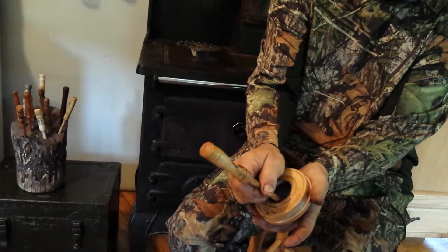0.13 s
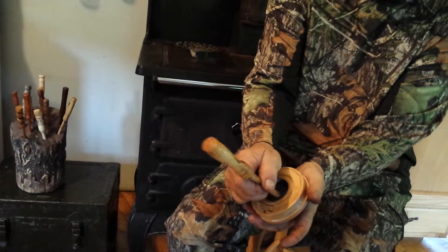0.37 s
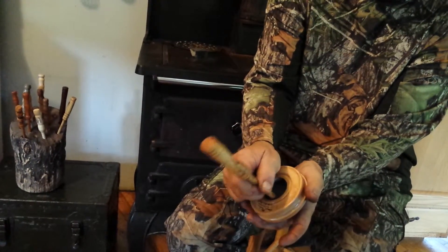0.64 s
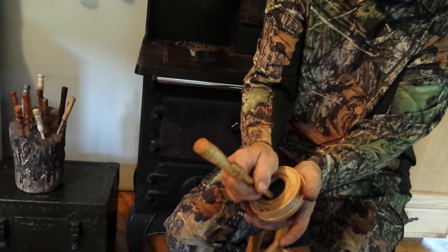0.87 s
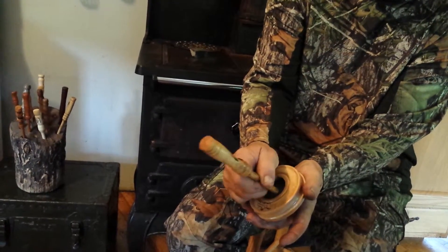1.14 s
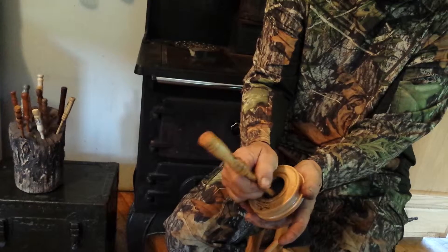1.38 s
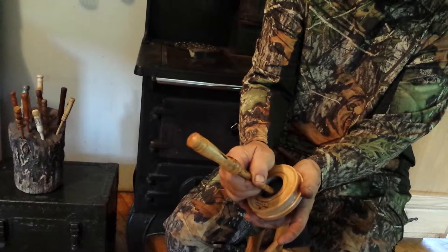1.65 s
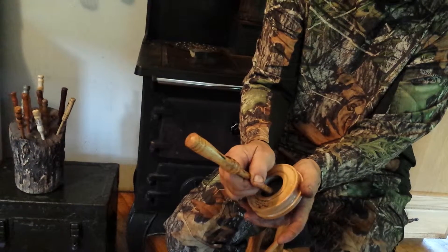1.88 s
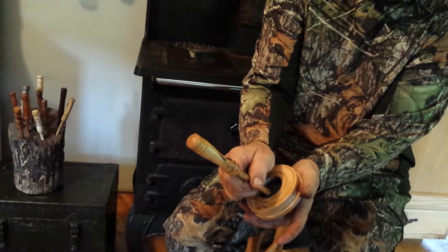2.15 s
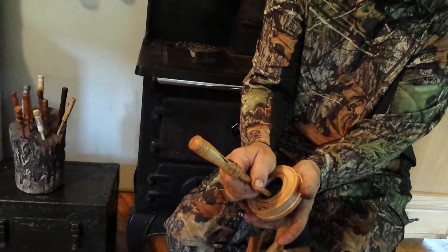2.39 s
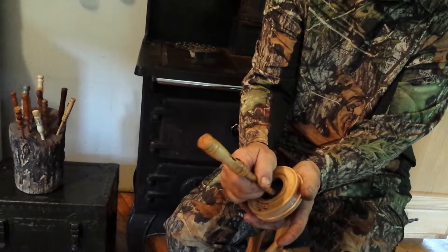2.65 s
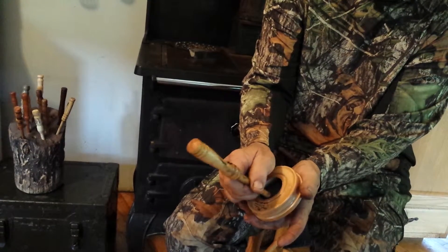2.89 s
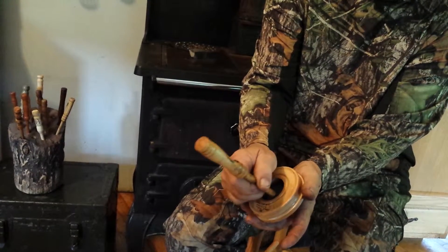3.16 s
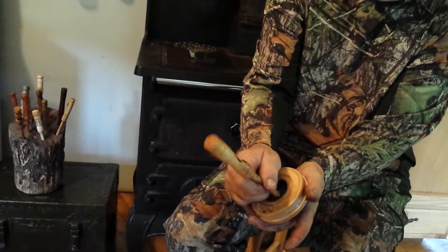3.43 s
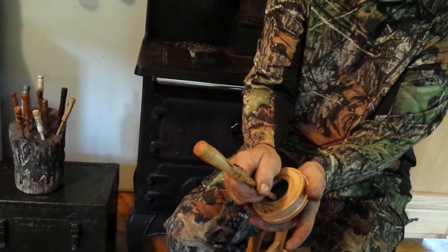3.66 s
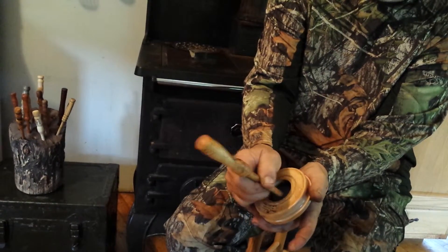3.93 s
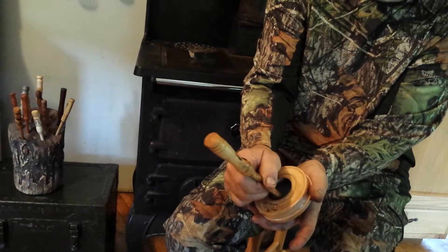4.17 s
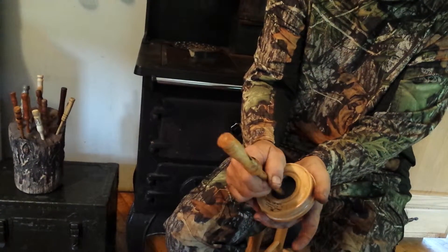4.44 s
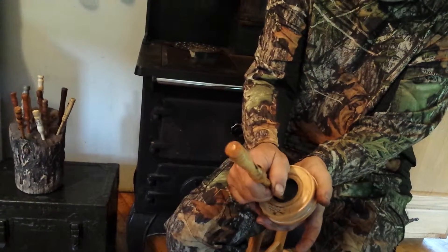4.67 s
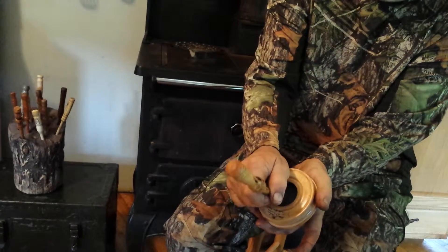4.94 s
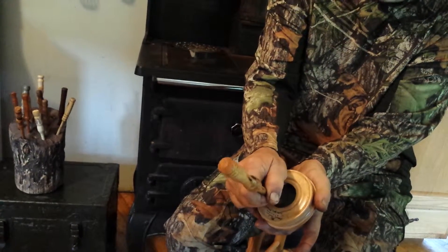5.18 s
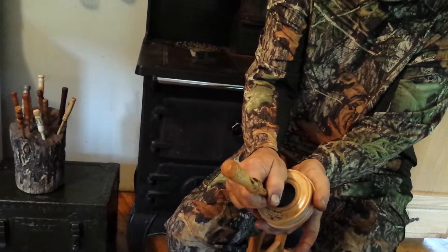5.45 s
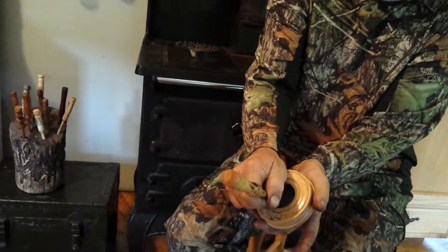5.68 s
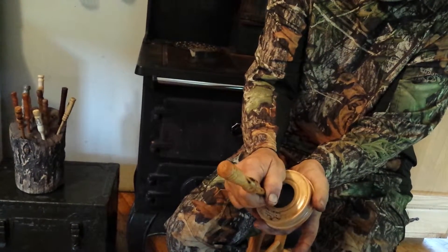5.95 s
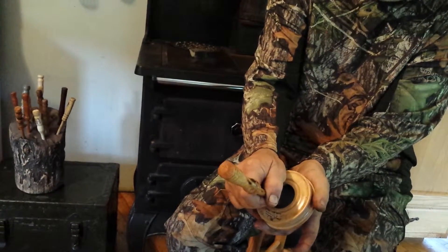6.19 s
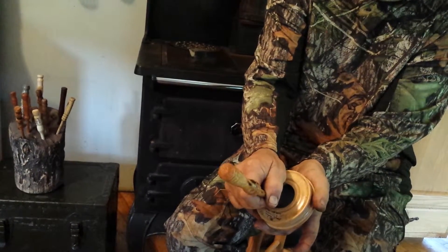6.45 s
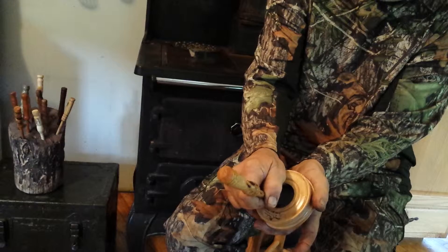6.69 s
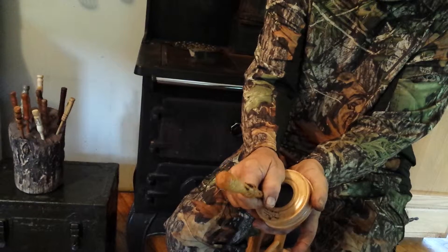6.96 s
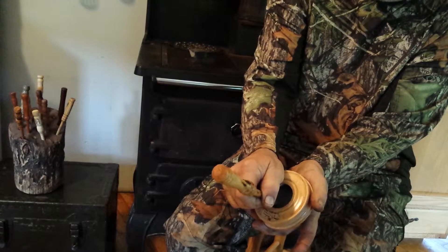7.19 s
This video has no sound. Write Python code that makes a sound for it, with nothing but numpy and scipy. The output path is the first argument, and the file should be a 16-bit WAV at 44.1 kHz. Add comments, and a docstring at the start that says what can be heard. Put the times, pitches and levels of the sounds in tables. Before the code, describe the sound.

A wooden striker on a slate turkey call gives a brief yelp, spaced sharp two-note clucks, then stuttering raspy purrs in a lively room.

```python
"""A bare, lively room, where a wooden striker is dragged over the slate of a pot call.
The tip sticks and slips hundreds of times a second, and that force rings the resonances of slate and pot.
A short yelp of sliding contacts opens; sharp clucks follow, a squeak breaking to a lower note; then purrs
in which the tip slides and hops along. Hisses of the free tip, taps and dry shaft ticks are strewn about.
Appliances hum faintly under air and hiss. The recorder ducks loud notes, rounds peaks, turns the quiet down."""
import sys
import numpy as np
from scipy import signal
from scipy.fft import rfft, irfft
from scipy.io import wavfile
from scipy.ndimage import uniform_filter1d

SR = 44100
rng = np.random.default_rng(int(sys.argv[2]) if len(sys.argv) > 2 else 0)


def log_audio(samples):
    """Write samples as a 16-bit WAV file to the path given in sys.argv[1]."""
    # one column per channel
    frames = np.atleast_2d(samples).T
    # limit to full scale, then quantise
    limited = np.clip(frames, -1, 1)
    pcm = np.round(limited * 32767).astype(np.int16)
    wavfile.write(sys.argv[1], SR, pcm)


def to_linear_factor(level_db):
    """Convert decibel levels (scalar or array-like) to linear amplitude factors."""
    exponent = np.asarray(level_db, float) / 20
    return 10 ** exponent


N = 323253

# Clucks. Each row: time of the pitch break in seconds, relative level in dB, mid-note pitch in Hz,
# squeak length in seconds, note length in seconds.
CLUCK_STROKES = [(0.758, -11.5, 573.5, .020, .05), (1.133, -7.5, 555.3, 0.017, .024),
                 (1.489, -10.5, 587.1, 0.022, .034), (2.719, -11.5, 579.7, 0.027, .037),
                 (3.122, -7, 587.8, 0.024, .03), (3.499, -6.5, 587.4, 0.019, .022),
                 (3.879, -8.5, 583.6, .018, .034)]
# The tip stays down and slides. Each row: start in seconds, relative level in dB, length in seconds,
# settling pitch in Hz, final pitch in Hz.
SLIDING_CONTACTS = [(0.284, -38.5, 0.022, 731, 710), (0.295, -18.5, .037, 587.8, 638),
                    (0.333, -27, 0.029, 733, 630), (0.347, -19.5, .082, 606, 568.5),
                    (4.925, -38.5, .049, 500, 517), (4.966, -30, .035, 540, 727),
                    (5.03, -28, 0.034, 689, 692), (5.074, -16.5, .09, 618, 744),
                    (5.496, -32.5, .034, 512, 606), (5.536, -31, 0.033, 557, 600),
                    (5.588, -27.5, .038, 576, 620), (5.624, -23.5, 0.026, 605, 663),
                    (5.69, -15.5, .034, 620, 828), (6.727, -36.5, 0.067, 554, 670)]
# The tip bounces along in a purr. Each row: start in seconds, relative level in dB, length in seconds.
HOPPING_CONTACTS = [(5.018, -22.5, .018), (5.045, -23.5, .031), (5.658, -18, .03), (5.732, -16, .034),
                    (5.771, -17.5, .026), (6.79, -30.5, 0.025), (6.825, -27, 0.016), (6.856, -26.5, .019),
                    (6.884, -29.5, 0.018), (6.915, -24.5, .02), (6.947, -22.5, 0.017), (6.976, -19, .022),
                    (7.008, -17.5, .021), (7.049, -21, .019)]
# The tip brushes the slate without gripping. Each row: start in seconds, relative level in dB,
# length in seconds.
LOOSE_BRUSHES = [(.07, -44, 0.057), (0.138, -44, 0.055), (.185, -36.5, .09), (.282, -32.5, .025)]
# The tip is set down on the slate. Each row: time in seconds, relative level in dB.
TIP_TAPS = [(0.023, -35.5), (0.615, -12), (0.978, -11.5), (2.489, -33), (3.706, -24), (4.917, -34.5),
            (6.668, -44)]
# Small dry ticks of the shaft. Each row: time in seconds, relative level in dB, upper ring in Hz.
SHAFT_TICKS = [(3.0037, -37.5, 10630), (4.648, -46, 2770), (4.687, -42, 2750), (4.797, -39, 2750),
               (4.902, -39, 2790), (6.399, -44, 2700), (6.445, -44, 6330), (6.599, -41.5, 2660),
               (6.662, -43, 2760)]
# Resonances of slate and pot. Each row: centre in Hz, width in Hz, relative level in dB,
# left over right in dB.
BODY_MODES = [(620, 600, -25.5, -4), (862.3, 85, 0.5, 3.5), (1227, 520, -5.5, 10), (1713, 204, 5.5, 9.5),
              (2834, 506, -12, 6.5), (3977, 15, -17.5, -7.5), (4480, 475, -14, -5), (5827, 500, -13.5, 6),
              (7360, 1900, -23, 0.5), (10000, 5300, -34.5, -20.5), (12400, 2100, -32.5, -11)]
# Dead zones between the modes. Each row: centre in Hz, width in Hz, depth from 0 to 1.
DEAD_ZONES = [(1040, 57, 0.5), (2218, 1480, 0.88), (3740, 450, 0), (5000, 440, 0.7)]
# Echoes off the first walls. Each row: delay in seconds, left level in dB, right level in dB.
WALL_ECHOES = [(.025, -20, -12.5), (.031, -19.5, -22), (0.035, -26.5, -21), (.046, -17, -16.5),
               (.062, -32, -34), (0.067, -22, -22.5)]
# Decay of the room tail. Each row: octave centre in Hz, time to fall 60 dB in seconds,
# left over right in dB.
ROOM_DECAY = [(500, 0.51, 2.5), (990, 0.56, 1.5), (1820, 0.54, 3.5), (4330, 0.52, 0), (7400, 0.34, 2),
              (12010, 0.32, -6)]
# Hum lines of the appliances. Each row: frequency in Hz, relative level in dB.
HUM_LINES = [(120, -71.5), (147.5, -74.5), (200.5, -73), (238, -75.5), (360, -73.5), (599, -76.5)]
# Spectrum of air and hiss. Each row: frequency in Hz, relative level in dB.
AIR_SPECTRUM = [(12, -48.5), (20, -12), (153, 0.5), (175, -9), (245, -3), (534, -10), (597, -15),
                (667, -10), (2470, -16.5), (13500, -19.5), (15500, -31)]
# Likeness of the air in the two channels. Each row: frequency in Hz, likeness from 0 to 1.
AIR_WIDTH = [(30, 0), (150, .6), (600, 0), (3000, 0.069), (12000, 0.082)]


def clucks():
    """The tip squeaks high while it grips, tears loose with a rasp, drops and holds a lower note until lifted."""
    squeak_hz, squeak_sag_hz_per_s, note_sag_hz_per_s = 887.7, 2700, 220
    break_s, overshoot, settle_s = 0.0034, 0.09, 0.007
    note_fade_db, let_go_s = -3.5, 0.0058
    force = np.zeros(N)
    for s, db, note_hz, squeak_s, note_s in CLUCK_STROKES:
        t = np.arange(-squeak_s - .015, note_s + 0.048, 1 / SR)   # 0 at the pitch break
        after = np.maximum(t, 0)
        loose = .5 + .5 * np.tanh(t / break_s)
        squeak = squeak_hz - squeak_sag_hz_per_s * np.maximum(t + squeak_s, 0)
        note = note_hz * (1 + overshoot * np.exp(-after / settle_s))
        note = note - note_sag_hz_per_s * (t - note_s / 2)
        pitch = squeak + loose * (note - squeak)
        weaker_squeak = to_linear_factor(-9.5 * (1 - loose))
        onset = 1 / (1 + np.exp(-(t + 0.76 * squeak_s) / 0.0016))
        squeak_swell = to_linear_factor(4.0 * np.minimum(t / squeak_s, 0))
        held = to_linear_factor(note_fade_db * after / note_s) * np.exp(-np.maximum(t - note_s, 0) / let_go_s)
        rasp = 1.3 + 1.5 * np.exp(-(t / .006) ** 2)
        dull_hz = 11000 - 4000 * loose * (1 - np.exp(-after / 0.036))   # the note dulls as it goes on
        level = to_linear_factor(db) * weaker_squeak * onset * squeak_swell * held
        add(force, s + t[0], level * slips(pitch, 0.47, dull_hz, rasp))
    return force


def skips():
    """Each light contact settles from its landing pitch, then bends to its final one as the tip loads up.
    A deep drop in pitch on landing comes with a brief extra press of the tip."""
    landing_s, bend, edge_s = 0.0021, 3.0, 0.0017
    jolt, jolt_s = 1.6, 0.0079
    force = np.zeros(N)
    for s, db, length_s, landing_hz, settled_hz, final_hz, swell_db in contacts():
        t = np.arange(0, length_s, 1 / SR)
        pitch = settled_hz + (landing_hz - settled_hz) * np.exp(-t / landing_s)
        pitch = pitch + (final_hz - settled_hz) * (t / length_s) ** bend
        edges = np.minimum(t / (edge_s + 0.26 * length_s), (length_s - t) / edge_s)
        contact = np.sin(np.pi / 2 * np.clip(edges, 0, 1))
        dull_hz = 4600 * to_linear_factor(0.18 * (db + 36.0))   # a lighter touch releases more softly
        tilt = .5 - 0.064 * (db + 11.5)   # and leans toward the fundamental
        pressed = 1 + jolt * (landing_hz / settled_hz - 1) * np.exp(-((t - jolt_s) / 0.0012) ** 2)
        level = to_linear_factor(db + swell_db * t / length_s) * contact * pressed
        add(force, s, level * slips(pitch, tilt, dull_hz, 0.45, waver=.014))
    return force


def contacts():
    """Drags and hops in order; a landing soon after a jump starts near the pitch the jump left off at.
    Gives start s, dB, length s, landing Hz, settling Hz, final Hz and level change in dB."""
    hop_low_hz, hop_top_hz, top_at_db, hop_hz_per_db = 550.2, 748.3, -23, 6.5   # harder hops climb higher
    drag_swell_db, hop_swell_db = -4, -8
    carry, carry_s = 0.78, .03
    moves = [(*drag, drag_swell_db) for drag in SLIDING_CONTACTS]
    for s, db, length_s in HOPPING_CONTACTS:
        final_hz = hop_top_hz + hop_hz_per_db * (db - top_at_db)
        moves.append((s, db, length_s, hop_low_hz, final_hz, hop_swell_db))
    rows, left_s, left_hz = [], -1, 0
    for s, db, length_s, settled_hz, final_hz, swell_db in sorted(moves):
        landing_hz = settled_hz + carry * (left_hz - settled_hz) * (s - left_s < carry_s)
        rows.append((s, db, length_s, landing_hz, settled_hz, final_hz, swell_db))
        left_s, left_hz = s + length_s, final_hz
    return rows


def slips(pitch_hz, tilt, dull_hz, grit, waver=.008):
    """Stick-slip force: one release a cycle, rounded above dull_hz, with fine slate grit torn loose each time."""
    wavering_hz = pitch_hz * (1 + waver * drift(140, size=len(pitch_hz)))
    turn = 2 * np.pi * np.cumsum(wavering_hz) / SR
    k = np.arange(1, 24)[:, None]   # harmonic numbers
    harmonics = k ** -tilt * np.cos(k * turn) / (1 + (k * pitch_hz / dull_hz) ** 4)
    release = rms_one(np.sum(harmonics, axis=0))
    fine = signal.lfilter([1, -1], [1, -.6], rng.standard_normal(len(turn)))
    return release + grit * np.maximum(np.cos(turn), 0) ** 2 * fine


def scrapes():
    """Bright hiss of the tip sliding free: loose brushes, and a short swell leading into each squeak."""
    lead_s, lead_db = 0.022, -25.5   # level is relative to the cluck
    force = np.zeros(N)
    leads = [(s - squeak_s - lead_s, db + lead_db, 1.3 * lead_s) for s, db, _, squeak_s, _ in CLUCK_STROKES]
    for s, db, length_s in LOOSE_BRUSHES + leads:
        t = np.arange(0, length_s, 1 / SR)
        hiss = np.diff(rng.standard_normal(len(t) + 2), n=2)   # differencing brightens the noise
        add(force, s, to_linear_factor(db) * np.sin(np.pi * t / length_s) * hiss)
    return force


def taps():
    """Short rounded pushes with a faint rattle; a straight blow stirs the region around 1100 Hz less than dragging."""
    soft_s, lift_db, missed = .00008, 18.5, 0.43
    force, t = np.zeros(N), np.arange(0, .01, 1 / SR)
    for s, db in TIP_TAPS:
        push = t / soft_s * np.exp(-t / soft_s)
        rattle = 0.078 * np.exp(-t / 0.0035) * rng.standard_normal(len(t))
        add(force, s + 0.00064, to_linear_factor(db + lift_db) * (push + rattle))
    return force - missed * resonance(force, 1100, 1000)


def pot_call(force):
    """The force rings the resonances of slate and pot; each radiates a little to one side."""
    out = np.zeros((2, N))
    for k, (hz, width, db, side_db) in enumerate(BODY_MODES):
        sides = to_linear_factor([[side_db / 2], [-side_db / 2]])
        out = out + (-1) ** k * to_linear_factor(db) * sides * resonance(force, hz, width)   # signs alternate
    for hz, width, depth in DEAD_ZONES:
        out = out - depth * resonance(out, hz, width)
    no_bass = signal.butter(4, 480, "high", fs=SR, output="sos")   # a small pot has no bass
    return to_linear_factor(8.0) * signal.sosfilt(no_bass, out)


def ticks():
    """Dry clicks of the wooden shaft, ringing for a few milliseconds."""
    out, click = np.zeros(N), np.eye(1, 600)[0]
    for s, db, hz in SHAFT_TICKS:
        upper = resonance(resonance(click, hz, .25 * hz), hz, .4 * hz)
        lower = resonance(click, 1700, 250)
        add(out, s, to_linear_factor(db + 23.0) * (upper - lower))
    return out


def room(direct):
    """A few wall echoes, then a dense tail that builds up and dies octave by octave."""
    build_s, tail_gain = 0.029, .7 * to_linear_factor(-2.5)
    t, reply = np.arange(SR) / SR, np.zeros((2, SR))
    for hz, t60, side_db in ROOM_DECAY:
        octave = signal.butter(2, [hz / 2 ** .5, hz * 2 ** .5], "band", fs=SR, output="sos")
        decay = to_linear_factor(-60 * t / t60 + [[side_db / 2], [-side_db / 2]])
        reply += signal.sosfilt(octave, rng.standard_normal((2, SR))) * decay
    reply *= 1 - np.exp(-(t / build_s) ** 2)
    reply *= tail_gain / np.sqrt(np.sum(reply ** 2) / 2)
    for delay_s, left_db, right_db in WALL_ECHOES:
        reply[:, round(delay_s * SR)] += to_linear_factor([left_db, right_db])
    return signal.fftconvolve(direct.mean(axis=0, keepdims=True), reply, axes=1)[:, :N]


def earlier_note():
    """The room still rings with a note played just before the start."""
    db, note_s, ago_s = -47, 0.051, 0.098
    force = np.zeros(N)
    falling_hz = np.linspace(860, 560, round(note_s * SR))
    add(force, 0, to_linear_factor(db) * slips(falling_hz, 0.68, 6000, 0.66))
    ago = round(ago_s * SR)
    return np.pad(room(pot_call(force))[:, ago:], ((0, 0), (0, ago)))


def background():
    """Room air and microphone hiss as shaped stereo noise, with hum lines that waver in level and phase."""
    air_db, hum_lift_db = -58.5, 8
    hz = np.fft.rfftfreq(N, 1 / SR)
    mid, side = rfft(rng.standard_normal((2, N)))
    alike = at_hz(AIR_WIDTH, hz)
    stereo = np.sqrt(1 + alike) * mid + np.sqrt(1 - alike) * side * [[1], [-1]]
    air = irfft(to_linear_factor(at_hz(AIR_SPECTRUM, hz)) * stereo, N)
    t, hum = np.arange(N) / SR, np.zeros(N)
    for f, db in HUM_LINES:
        level = to_linear_factor(db + hum_lift_db + 1.5 * drift(3))
        hum += level * np.sin(2 * np.pi * f * t + .4 * drift(3))
    return to_linear_factor(air_db) * rms_one(air) + hum


def resonance(x, hz, width):
    """Two-pole ring with gain 1 on top."""
    r = np.exp(-np.pi * width / SR)
    poles = [1, -2 * r * np.cos(2 * np.pi * hz / SR), r * r]
    return (1 - r * r) / 2 * signal.lfilter([1, 0, -1], poles, x + 1e-18)


def drift(rate, size=N):
    """Smooth chance that changes about rate times a second; spread 1."""
    knots = rng.standard_normal(size // 20 + 400)   # one knot every 20 samples
    r = np.exp(-40 * np.pi * rate / SR)
    slow = signal.lfilter([1], [1, -2 * r, r * r], knots)[398:]
    return np.interp(np.arange(size) / 20, np.arange(len(slow)), rms_one(slow))


def rms_one(x):
    """Scale to rms 1."""
    return x / np.sqrt(np.mean(x ** 2) + 1e-20)


def at_hz(points, hz):
    """Read a table on a log-frequency axis."""
    table_hz, values = np.transpose(points)
    return np.interp(np.log(hz + 1), np.log(table_hz), values)


def add(track, s, piece):
    """Mix a piece into a track from s seconds on."""
    at = round(s * SR)
    track[at:at + len(piece)] += piece


def scene():
    """The call, its room and the background."""
    direct = pot_call(clucks() + skips() + scrapes() + taps()) + ticks()
    direct[0, 1:] = direct[0, :-1]   # the left port is a hair farther away: one sample
    return direct + room(direct) + earlier_note() + background()


def bass_of(x):
    """What lies under the call's lowest note, filtered without delay."""
    return signal.sosfiltfilt(signal.butter(3, 440, fs=SR, output="sos"), x)


def held_level(x, fall_db_s):
    """Level in dB that jumps up at once and falls at no more than a set rate."""
    db = 10 * np.log10(uniform_filter1d(np.mean(x ** 2, axis=0), 256) + 1e-12)
    ramp = fall_db_s * np.arange(N) / SR
    return np.maximum.accumulate(db + ramp) - ramp


def eased(db, ease_s):
    """One-pole smoothing of a gain in dB, given back as a factor."""
    r = np.exp(-1 / (ease_s * SR))
    return to_linear_factor(signal.lfilter([1 - r], [1, -r], db, zi=[r * db[0]])[0])


def roll_off(x):
    """The treble ends steeply here."""
    return signal.sosfilt(signal.butter(12, 15100, fs=SR, output="sos"), x)


def record(dry):
    """An expander turns the quiet down, slower in the bass; a compressor ducks loud notes; peaks are rounded."""
    gate_db, slope, depth_db = -44, .55, 13
    bass_gate_db, bass_slope, bass_depth_db = -35.5, 0.53, 13.5
    limit_db, squeeze = -11, 0.32
    quiet_db = np.clip(slope * (held_level(dry, 120.0) - gate_db), -depth_db, 0)
    sinking_db = np.clip(bass_slope * (held_level(dry, 92.0) - bass_gate_db), -bass_depth_db, 0)
    masked_db = -.8 * np.maximum(held_level(dry, 250.0) + 18, 0)   # loud notes push the bass down
    bass = bass_of(dry)
    gated_bass = bass * eased(sinking_db, 0.045) * eased(masked_db, 0.0041)
    gated_rest = (dry - bass) * eased(quiet_db, 0.002) * eased(0.274 * sinking_db, .01)
    duck_db = -squeeze * np.maximum(held_level(dry, 110.0) - limit_db, 0)
    ducked = (gated_bass + gated_rest) * eased(duck_db, 0.0034)
    rounded = .97 * np.tanh(ducked / .97)
    rounded += bass_of(ducked - rounded)   # only the bright peaks are rounded
    dulled = signal.sosfilt(signal.butter(2, 12500, fs=SR, output="sos"), rounded)   # microphone roll-off
    return roll_off(dulled)


dry = scene()
out = record(dry)
log_audio(out)
```